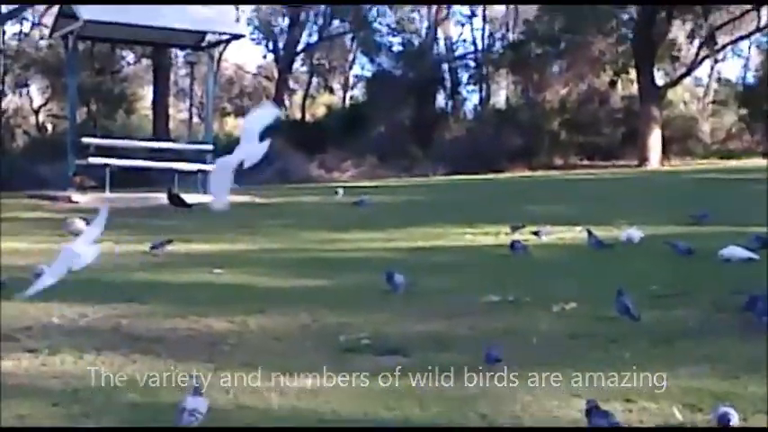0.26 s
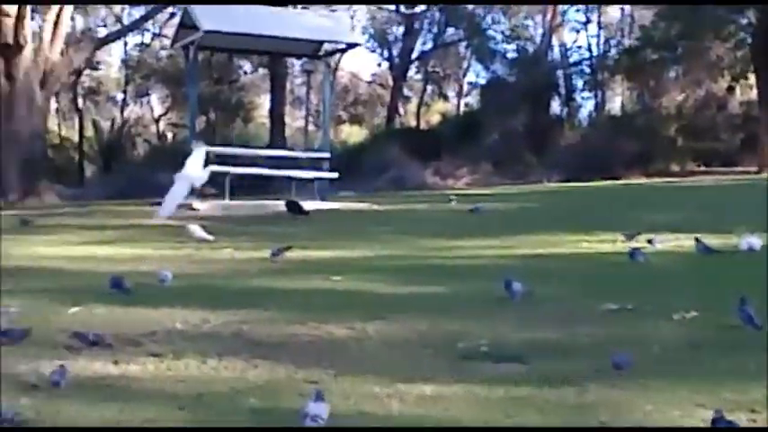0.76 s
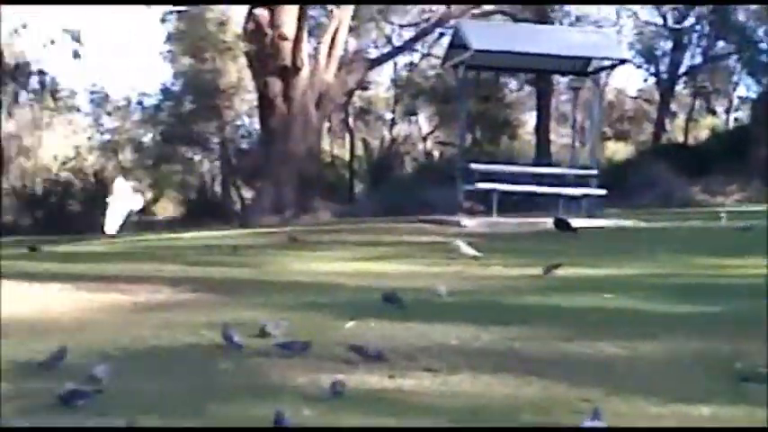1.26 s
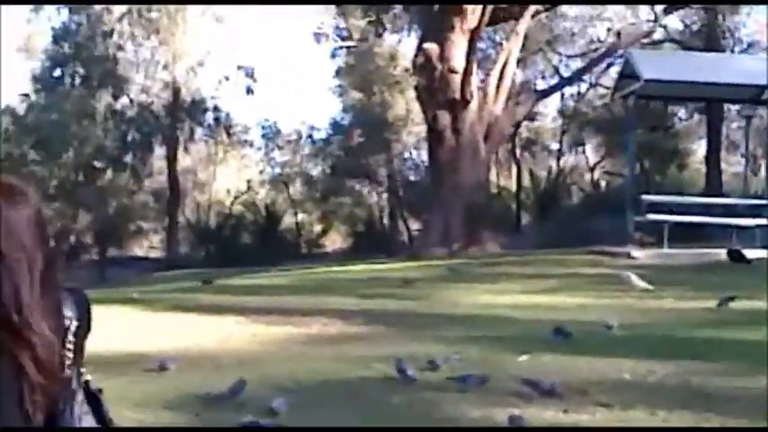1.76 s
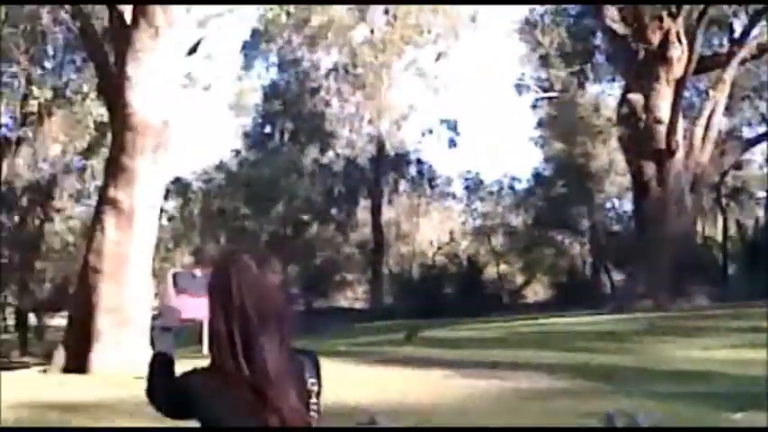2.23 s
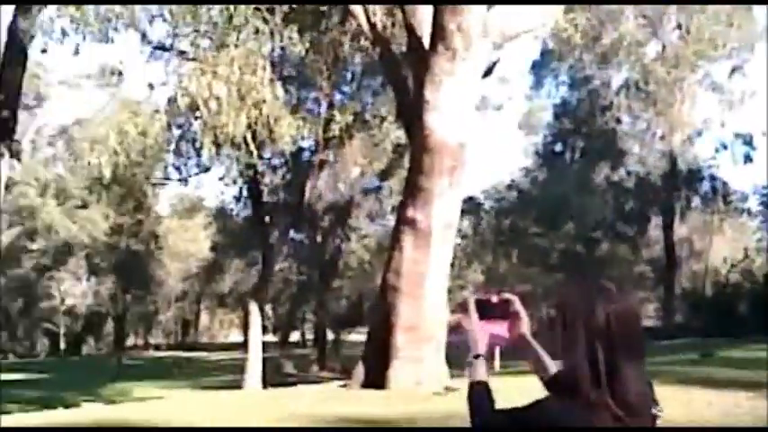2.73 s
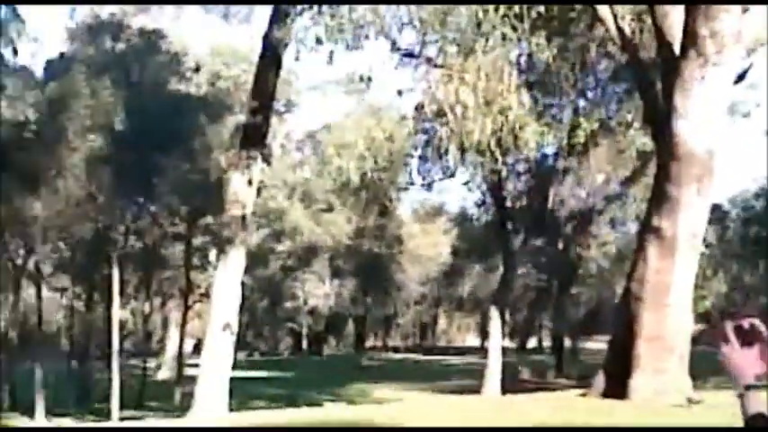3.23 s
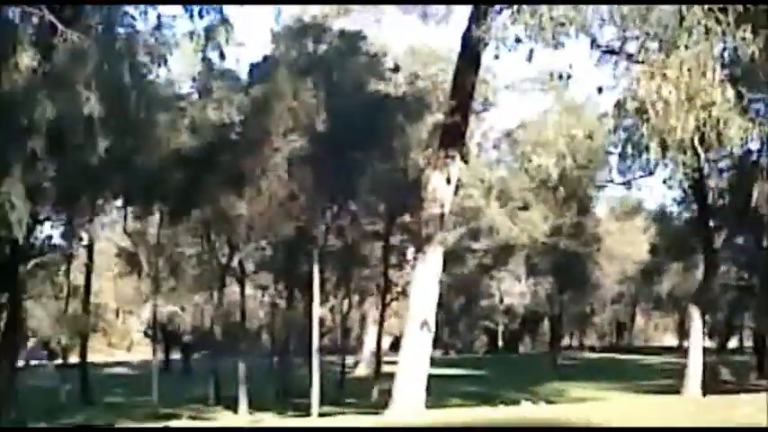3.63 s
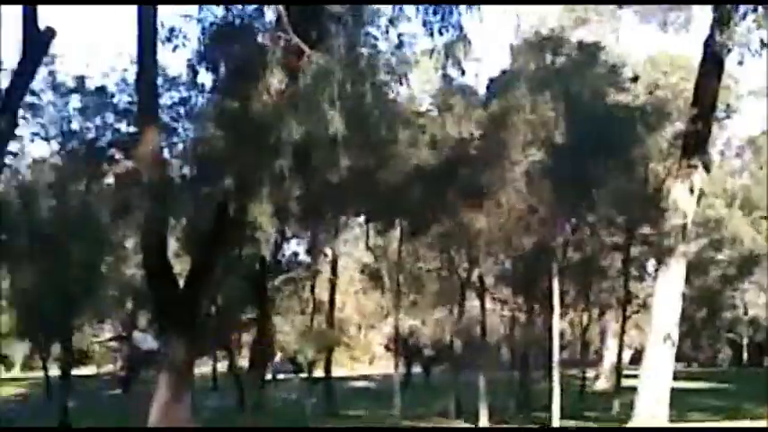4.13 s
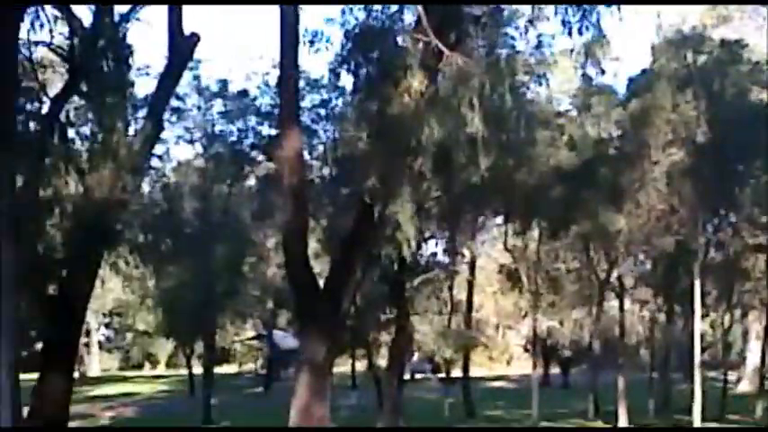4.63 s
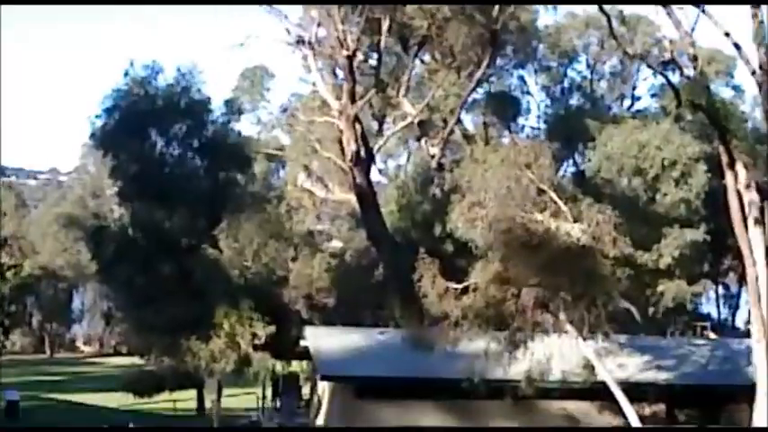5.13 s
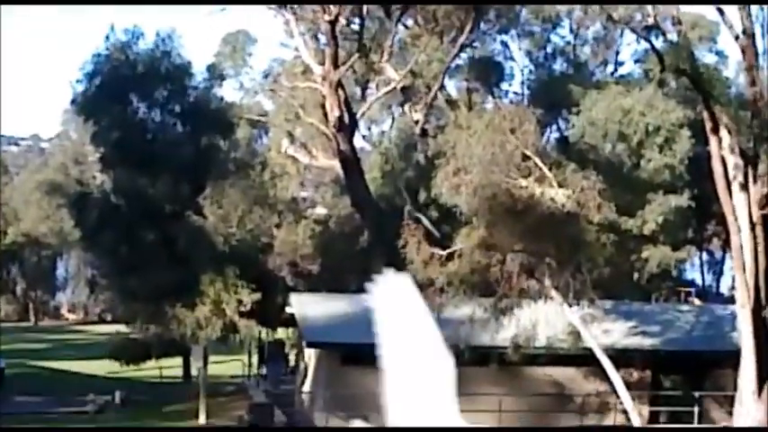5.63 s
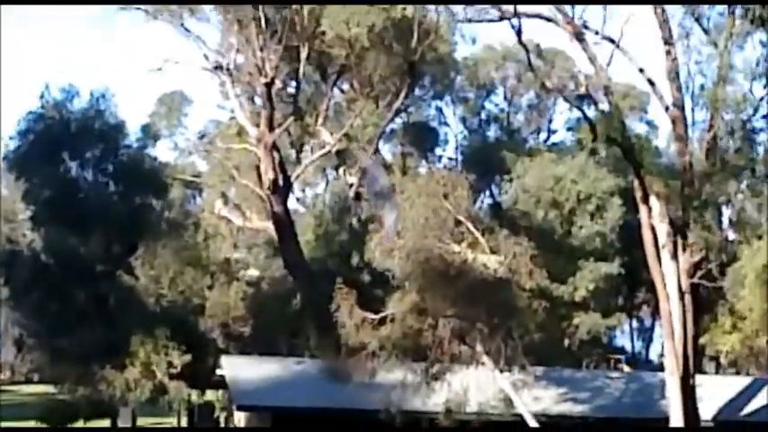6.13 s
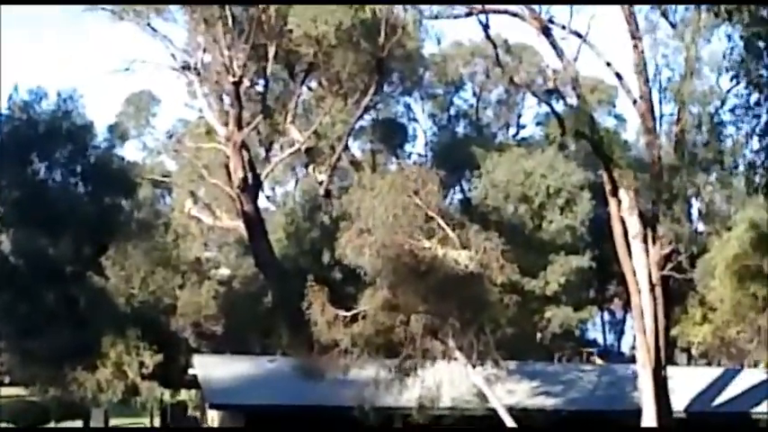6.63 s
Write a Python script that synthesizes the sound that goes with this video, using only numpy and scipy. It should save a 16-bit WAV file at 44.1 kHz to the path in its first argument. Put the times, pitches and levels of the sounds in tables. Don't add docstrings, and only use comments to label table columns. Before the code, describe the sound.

Outdoor hand-held sound with deep gusty rumble and blunt wind thuds. Harsh, nasal parrot calls of about a tenth of a second bend up and down, some bright and close, others duller. A low dove coo rolls beneath them at intervals. After an abrupt short silence around five seconds, airy feather rushes pass close, followed by a few fading squawks, soft leaf noise and faint tree echo.

```python
import sys
import numpy as np
from scipy import signal
from scipy.fft import rfft, irfft, next_fast_len
from scipy.io import wavfile
from scipy.ndimage import uniform_filter1d

SR = 44100
rng = np.random.default_rng(int(sys.argv[2]) if len(sys.argv) > 2 else 0)


def waveform_to_disk(signal):
    frames = np.transpose(np.atleast_2d(signal))
    scaled = np.clip(frames, -1, 1) * 32767
    samples = np.round(scaled).astype(np.int16)
    wavfile.write(sys.argv[1], SR, samples)


def level_to_linear(level):
    exponent = np.asarray(level, float) / 20
    return 10 ** exponent


N = 303849
T = np.arange(N) / SR


def unit(x):
    return x / np.sqrt(np.mean(x ** 2) + 1e-18)


def shaped(x, gain):
    size = next_fast_len(len(x))
    f = np.fft.rfftfreq(size, 1 / SR) + 1e-3
    return irfft(rfft(x, size) * gain(f), size)[:len(x)]


def shaped_noise(n, gain):
    return shaped(rng.standard_normal(n), gain)


def ring(f, hz, width):
    return 1j * f * width / (hz ** 2 - f ** 2 + 1j * f * width)


def walk(n, rate):
    k = max(int(SR / rate), 1)
    return unit(uniform_filter1d(uniform_filter1d(rng.standard_normal(n), k), k))


def glide(t, s, v):
    place = np.interp(t, s, np.arange(len(s)))
    k = np.minimum(place.astype(int), len(s) - 2)
    return v[k] + (v[k + 1] - v[k]) * (1 - np.cos(np.pi * (place - k))) / 2


def add(out, s, x):
    i = int(s * SR)
    out[i:i + len(x)] += x[:N - i]


def air():
    # hz, level_db
    park_spectrum = [(190, -20.5), (330, -5.5), (605, -4.5), (874, -9), (1220, -10.5), (1320, -12.5),
                     (2590, -14.5), (2850, -20), (5750, -18), (15000, -28)]
    hz, db = np.transpose(park_spectrum)
    park = unit(shaped_noise(N, lambda f: level_to_linear(np.interp(np.log(f), np.log(hz), db))))
    drone = unit(shaped_noise(N, lambda f: abs(ring(f, 122, 9.6)) ** 2))
    return level_to_linear(-64 + 1.3 * walk(N, 8.5)) * park + level_to_linear(-58) * drone


def wings():
    # peak_s, peak_db, swell_db_per_s, fade_db_per_s
    passes = [
        (5.26, -50, 126.5, 900),
        (5.86, -62.5, 320, 1200),
    ]
    rush = unit(shaped_noise(N, lambda f: abs(ring(f, 9000, 14000))))
    level = 0
    for s, db, swell, fade in passes:
        level = level + level_to_linear(db - np.where(T < s, swell * (s - T), fade * (T - s)))
    return level * rush


def gusts():
    # time_s, level_db
    gust_course = [(0.0, -37.5), (0.56, -31), (0.69, -32), (0.86, -45.5), (2.11, -45.5), (2.23, -39),
                   (2.76, -38), (3.1, -38.5), (3.83, -36), (4.2, -45), (4.72, -38), (4.88, -35),
                   (5.06, -47.5), (5.324, -56), (5.972, -45), (6.394, -51), (6.604, -51), (6.89, -47)]
    gust_db = np.interp(T, *np.transpose(gust_course))
    deep = shaped_noise(N, lambda f: abs(ring(f, 43.4, 49)) / (1 + (f / 110) ** 3))
    upper = shaped_noise(N, lambda f: abs(ring(f, 138.7, 200)) ** 2 / (1 + (f / 350) ** 2))
    deep = unit(deep * level_to_linear(1.3 * walk(N, 36)))
    upper = unit(upper * level_to_linear(4.5 * walk(N, 40)))
    return level_to_linear(gust_db + 3.5) * deep + level_to_linear(0.98 * gust_db - 11.0) * upper


def slaps():
    # peak_s, peak_db, pitch_hz
    eddies = [(0.082, -18.5, 77.3), (0.192, -26, 136), (0.255, -20, 91.7), (0.287, -18, 107.5),
              (0.313, -25.5, 87), (0.396, -19.5, 137), (0.516, -21, 47), (0.6, -13.5, 164),
              (0.626, -14.5, 82), (0.651, -15.5, 192.5), (1.84, -23.5, 70), (2.053, -9, 111),
              (2.077, -19.5, 51), (2.114, -22, 163), (2.141, -14.5, 216.5), (2.301, -22.5, 75),
              (2.354, -26.5, 87.2), (2.471, -19.5, 86.6), (2.586, -24.5, 68), (2.763, -23, 92.7),
              (2.807, -23, 109), (2.858, -8, 128.2), (2.911, -16, 68.3), (3.03, -17, 139),
              (3.221, -21, 152), (3.662, -19, 94.6), (3.744, -23, 92.3), (3.772, -21, 83.2),
              (3.902, -26, 87.6), (6.732, -29.5, 122.7)]
    out = np.zeros(N)
    signs = rng.choice([-1, 1], len(eddies))
    for (s, db, hz), sign in zip(eddies, signs):
        turns = np.arange(-2, 5, hz / SR)
        width = np.where(turns < 0, .4, .6)
        snap = np.sin(2 * np.pi * turns) * np.exp(-(abs(turns) / width) ** 1.89)
        heave = np.sin(2 * np.pi * 0.435 * turns) * np.exp(-((turns - .6) / 2.84) ** 2)
        flutter = unit(shaped_noise(len(turns), lambda f: abs(ring(f, 318, 356)) ** 4))
        flutter = flutter * np.exp(-(turns / 0.84) ** 2)
        flutter_gain = level_to_linear(-23) * (hz / 150) ** 2
        slap = snap + level_to_linear(-4.) * heave + flutter_gain * flutter
        fade = signal.windows.hann(len(turns)) ** .5
        add(out, s - 2 / hz, 1.24 * sign * level_to_linear(db) * slap * fade)
    return out


def piping():
    # start_s, end_s, start_hz, end_hz, level_db
    pipes = [
        (2.25, 2.38, 1900, 1890, -68),
        (1.9, 2.8, 4050, 4300, -80),
        (2.1, 2.8, 5700, 5950, -79),
        (5.55, 5.67, 3550, 3350, -72),
        (6.85, 6.89, 3750, 3750, -66),
    ]
    # start_s, end_s, start_hz, end_hz, level_db
    chirrs = [
        (-.04, .13, 3550, 3500, -52),
        (.14, .22, 3600, 3600, -58),
        (.08, .095, 6900, 6900, -66),
    ]
    out = np.zeros(N)
    # smear_hz, gain_db
    for notes, smear_hz, gain_db in ((pipes, 40, 0), (chirrs, 300, 0), (chirrs, 1500, -2)):
        for s0, s1, hz0, hz1, db in notes:
            n = int((s1 - s0) * SR)
            carrier = np.exp(2j * np.pi * np.cumsum(np.linspace(hz0, hz1, n)) / SR)
            tone = np.real(carrier * (walk(n, smear_hz) + 1j * walk(n, smear_hz)))
            note = level_to_linear(db + gain_db) * tone * signal.windows.tukey(n, .6)
            missed = int(max(-s0, 0) * SR)
            add(out, max(s0, 0), note[missed:])
    return out


def dove():
    # delay_s, level_db under the peak, pitch_hz
    roll = [
        (0, -4, 300),
        (0.041, -1.5, 342.5),
        (.085, -1, 376.5),
        (.133, 0.9, 387.6),
        (.182, -1, 355),
        (.24, -4, 313.5),
    ]
    # start_s, peak_db, held_delay_s, held_length_s, held_level_db
    phrases = [
        (1.064, -41, 0.34, 0.15, -53),
        (2.306, -37.5, 0.38, 0.12, -48),
        (3.454, -36, .318, 0.175, -47),
        (4.605, -35, .251, .051, -40.5),
    ]
    octave, rasp_gain = level_to_linear(-15.0), level_to_linear(-10.5)
    out, t = np.zeros(N), np.arange(0, .05, 1 / SR)
    puff = (t / 0.0065) ** 2 * np.exp(2 - 2 * t / 0.0078)
    for s, peak_db, wait, length, held_db in phrases:
        for delay, db, hz in roll:
            phase = 2 * np.pi * hz * t
            rasp = unit(shaped_noise(len(t), lambda f: abs(ring(f, 420, 210)) ** 2))
            coo = np.sin(phase) + octave * np.sin(2 * phase) + rasp_gain * rasp
            add(out, s + delay - .004, level_to_linear(peak_db + db) * puff * coo)
        u = np.clip(T - s - wait, 0, length)
        held_hz = 322.4 + 50 * np.exp(-u / 0.017) - 185 * u
        phase = 2 * np.pi * np.cumsum(held_hz) / SR
        gate = np.clip(np.minimum(u, length - u) / 0.0091, 0, 1) * level_to_linear(3.8 * walk(N, 40))
        out += np.sqrt(2) * gate * level_to_linear(held_db) * (np.sin(phase) + octave * np.sin(2 * phase))
    return out


def trees(x, first_s=0.035, t60_s=0.66):
    t = np.arange(0, .6, 1 / SR)
    decay = np.exp(-np.log(1000) * t / t60_s)
    tail = rng.standard_normal(len(t)) * decay * np.clip(t / first_s, 0, 1) ** 2
    tail = shaped(tail, lambda f: abs(ring(f, 1500, 2500)) ** 2)
    return signal.fftconvolve(x, tail / np.sqrt(np.sum(tail ** 2)))[:N]


def ground(x, spread_s=.014, bounce_db=-11.):
    t = np.arange(0, .04, 1 / SR)
    sparse = rng.random(len(t)) < .01
    scatter = rng.standard_normal(len(t)) * sparse * np.exp(-t / spread_s)
    return x + level_to_linear(bounce_db) * signal.fftconvolve(x, scatter / np.sqrt(np.sum(scatter ** 2)))[:N]


def contours():
    shapes = { "double": [(0, -.35, -32.5), (.23, .45, -8), (.47, 0, -4), (.82, 0.91, -2), (1, .48, -8)],
              "triple": [(0, .3, -33.5), (.15, .58, -10), (.38, 0.047, -11), (.63, 1, -.5),
              (.78, .18, -6.5), (.88, .55, -4), (1, 0.28, -27.5)], "plunge": [(0, 0.4, -20.5),
              (.24, 1, 1.5), (.59, 0, -3), (.83, .6, 0), (1, .48, -36.5)], "scoop": [(0, .4, 1.5),
              (.23, 0, 0), (.74, 1, 0), (1, .8, -28.5)], "arch": [(0, 0.0074, -11), (.38, 0.87, -2.5),
              (1, 0.17, -9)], "held": [(0, 0.87, -1), (.3, .95, -1.5), (.85, .7, -4), (1, 0.059, -5)], }
    warbles = { "double": [(.105, 0.082, 554, 623, -43, "low"), (.758, 0.093, 776, 879, -32, "open"),
               (1.249, .076, 625, 706, -32.5, "above"), (1.785, 0.079, 609, 708, -28, "above"),
               (2.995, 0.076, 630, 731, -32, "aside"), (3.508, 0.094, 728, 883, -36, "chest"),
               (5.878, .101, 602.4, 708, -32.5, "level")],
               "triple": [(1.328, 0.11, 764, 1056, -31.5, "gaping"), (4.208, 0.13, 672, 882, -30, "open"),
               (5.148, 0.13, 660, 880, -34, "leaving"), (6.133, 0.14, 620, 863, -35.5, "leaving")], }
    simple_calls = { "plunge": [(6.501, .088, 591, 696, -57, "low"), (4.701, .091, 500, 636, -44, "leafy"),
                    (5.341, .104, 467, 712, -32.5, "close"), (6.291, .106, 561, 656, -53.5, "hidden")],
                    "scoop": [(.997, 0.098, 688, 763, -30, "gaping"),
                    (1.868, 0.058, 517, 621, -35, "above"), (3.066, 0.083, 596.5, 661.4, -36.5, "sharp"),
                    (3.148, 0.046, 441, 485, -47, "away"), (5.974, 0.052, 523, 622, -40, "low")],
                    "arch": [(.272, 0.049, 635, 738, -40.5, "aside"),
                    (4.645, 0.069, 906, 952, -41, "hidden"), (4.848, 0.031, 912, 981, -34.5, "leafy")],
                    "held": [(1.065, 0.097, 663.3, 685.7, -29, "nasal"),
                    (1.1, 0.18, 596, 647, -34, "nasal"), (4.04, 0.034, 466, 501, -46.5, "sinking"),
                    (4.34, 0.059, 770, 805, -42.5, "hidden")], }
    # posture, then rows of time_s, pitch_hz, level_db
    screeches = [ ("tucked", [(0.208, 526.5, -38), (0.24, 611.7, -28), (0.268, 497, -35.5)]),
                 ("gaping", [(0.852, 655.4, -61), (0.87, 713, -39.5), (0.92, 721.7, -32.5),
                 (0.99, 810, -26.5), (1.005, 790, -34.5)]), ("toward", [(4.522, 785, -64.5),
                 (4.547, 959, -25.5), (4.594, 641, -33), (4.622, 952, -26.5), (4.645, 776, -38.5)]),
                 ("toward", [(1.568, 747, -72), (1.583, 752, -44), (1.62, 635, -41.5), (1.655, 808, -39.5),
                 (1.678, 633, -43.5), (1.705, 676, -82)]), ("away", [(3.226, 599, -47), (3.272, 715, -46),
                 (3.3, 473, -48.5), (3.325, 570, -49.5), (3.338, 540, -77)]),
                 ("aside", [(3.948, 510.4, -77), (3.968, 597.7, -43.5), (3.995, 559, -38.5),
                 (4.03, 657, -39), (4.043, 600, -70)]), ("chest", [(2.922, 652, -59), (2.955, 794, -41),
                 (2.975, 742.4, -42.5), (3.015, 781, -37.5)]), ]
    for kind, calls in {**warbles, **simple_calls}.items():
        for s, length, low_hz, top_hz, db, posture in calls:
            rows = []
            for share, place, under_db in shapes[kind]:
                rows.append((s + length * share, low_hz + (top_hz - low_hz) * place, db + under_db))
            yield kind, posture, rows
    for posture, rows in screeches:
        yield "screech", posture, rows


def squawk(rows, facing_db, hoarse, beak_db, patchy_db=3.5, top_hz=7600):
    # centre_hz, width_hz
    throat_rings = [(680, 1040), (1350, 594), (2100, 1040), (3400, 1540), (5200, 4040)]
    s, hz, db = np.transpose(rows)
    t = np.arange(s[0] - .006, s[-1] + .012, 1 / SR)
    hoarse = np.clip(hoarse + 0.45 * np.exp((np.minimum(t, s[-1]) - s[-1]) / 0.0074), 0, 1)
    pitch = glide(t, s, hz) * (1 + .011 * (.15 + hoarse) * walk(len(t), 350))
    phase = 2 * np.pi * np.cumsum(pitch) / SR
    opening_db = beak_db * np.linspace(-.5, .5, len(t))
    tone = 0
    for k in range(1, 21):
        flicker_db = patchy_db * (k / 3) ** .4 * walk(len(t), 55)
        flicker_db = flicker_db + 6 * (.2 + hoarse) * walk(len(t), 300)
        tone = tone + level_to_linear(flicker_db + opening_db * np.log2(k / 3)) * np.cos(k * phase + .6 * k * k)
    hiss = rng.standard_normal(len(t)) * (1 + np.cos(phase))
    source = (1 - .8 * hoarse) * tone / 3.5 + (.11 + .75 * hoarse) * hiss

    def throat(f):
        passed = sum(level_to_linear(g) * abs(ring(f, c, w)) ** 3 for g, (c, w) in zip(facing_db, throat_rings))
        return passed * (.12 + 1 / (1 + (f / top_hz) ** 8))

    voice = unit(shaped(source, throat))
    edges = np.clip((t - t[0]) / 0.013, 0, 1) * np.clip((t[-1] - t) / 0.021, 0, 1)
    return voice * glide(t, s, level_to_linear(db / 2)) ** 2 * edges, t[0]


def parrots():
    facing = {"toward": (-12.5, -7, -0.5, 4.5, 0), "open": (-20, 6.5, 4.5, -0.5, -8),
              "low": (0, -1, -4.5, -5.5, -13.5), "nasal": (-12.5, -18.5, 5.5, -1, -6),
              "sharp": (-4.5, 9.5, 3, 5, -11.5), "aside": (-8, 1.5, 1.5, -11.5, -31),
              "away": (-4, 4, -18, -20, -30), "chest": (-6, 5.5, -2, -5.5, -14.5),
              "gaping": (0.5, -13, 11, 5, -5), "above": (-4.5, 2.8, -2, 14, -8.5),
              "close": (0, 3, -2, -8.5, -13.5), "hidden": (-3.5, 6.5, 2.5, -12, -5),
              "leafy": (-27, -5.5, 5.5, -1, -14.5), "tucked": (-4.5, 1, -29, -19, -27),
              "level": (-4.5, 4.5, 1, -8.5, -9.5), "sinking": (-16, 8, 4.5, -36, -41),
              "leaving": (-8, 10, 5.5, -9, -13)}
    beak_echo = {"toward": (.7, -23.5), "open": (4.9, -25), "low": (1.5, -51), "nasal": (-4, -12),
                 "sharp": (-5, -26.5), "aside": (-0.94, -35), "away": (-1.5, -28), "chest": (6.2, -20.5),
                 "gaping": (1.5, -25), "above": (-1.5, -31.5), "close": (-0.5, -36), "hidden": (-5, -15),
                 "leafy": (-7, -39), "tucked": (-1.5, -33.5), "level": (4.2, -34), "sinking": (-6, -38.5),
                 "leaving": (3.74, -23.5)}
    kind_hoarse = {"double": .14, "triple": .18, "plunge": .17, "scoop": .36, "arch": .42, "held": .26,
                   "screech": .15}
    posture_hoarse = {"hidden": .5, "leafy": .5, "sinking": .05}
    near, far = np.zeros(N), np.zeros(N)
    for kind, posture, rows in contours():
        beak_db, echo_db = beak_echo[posture]
        hoarse = posture_hoarse.get(posture, kind_hoarse[kind])
        call, s = squawk(rows, facing[posture], hoarse, beak_db)
        add(near, s, call)
        add(far, s, level_to_linear(echo_db) * call)
    return ground(near) + trees(far)


def scene():
    background = air() + wings() + gusts() + slaps()
    return (background + piping() + dove() + parrots())[None]


def low_pass(x):
    return signal.sosfilt(signal.butter(12, 15710, fs=SR, output="sos"), x)


def record(dry):
    drop_s, resume_s = 4.8852, 5.05
    gate = np.where(T < drop_s, 1, np.clip((T - resume_s) / 0.0011, 0, 1))
    linger = (T >= drop_s) * np.clip((drop_s + 0.016 - T) / 0.013, 0, 1)
    hiss = unit(shaped_noise(N, lambda f: 1 / (1 + f / 2500)))
    return low_pass(dry * gate + level_to_linear(-54.0) * linger * hiss)


dry = scene()
out = record(dry)
waveform_to_disk(out)
```